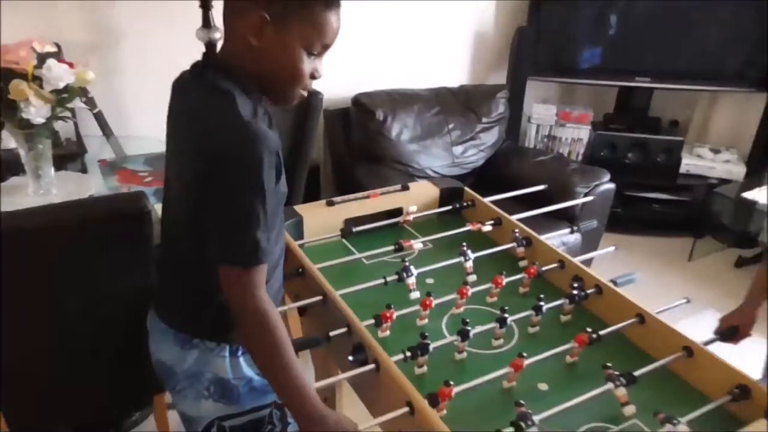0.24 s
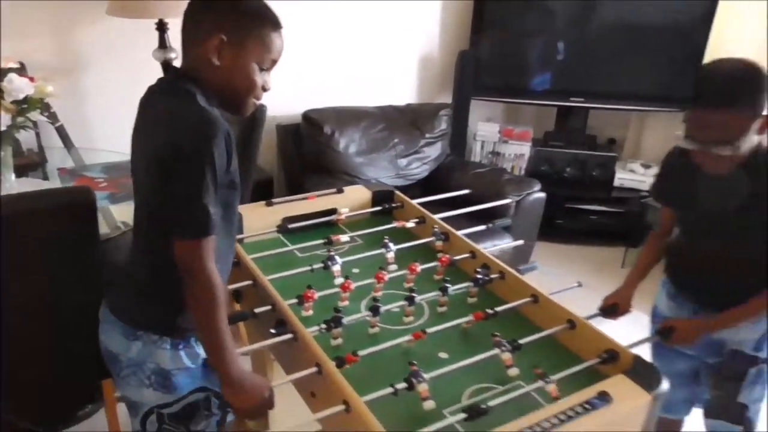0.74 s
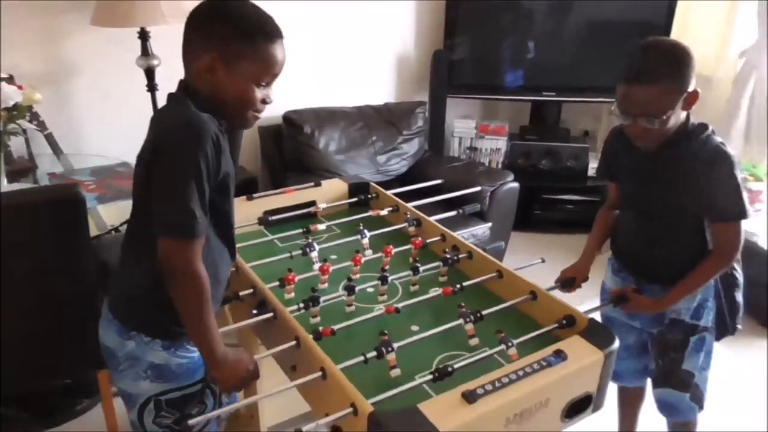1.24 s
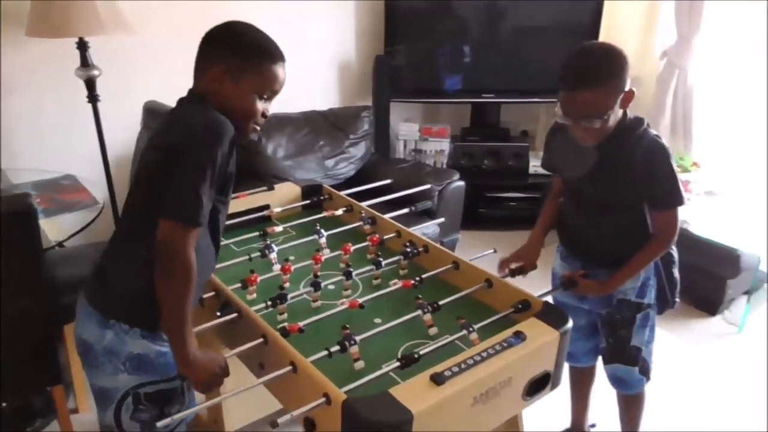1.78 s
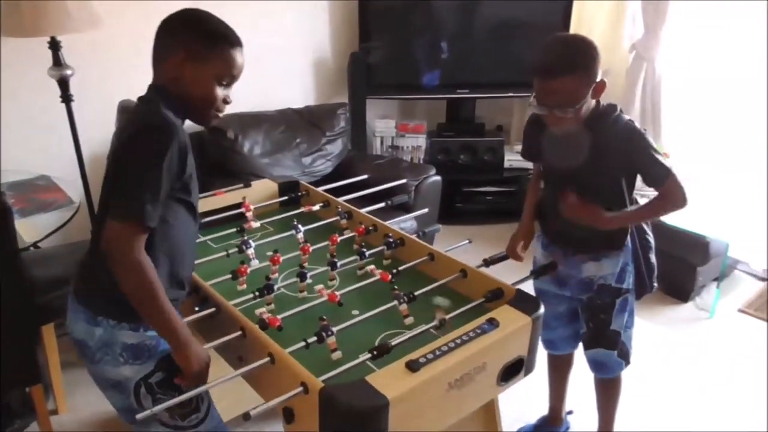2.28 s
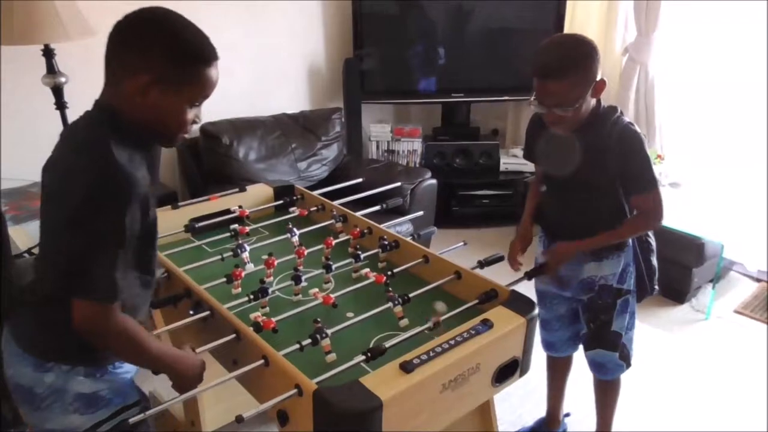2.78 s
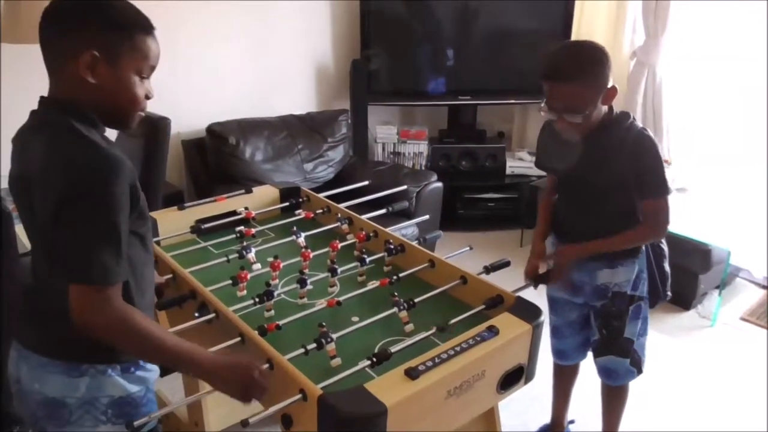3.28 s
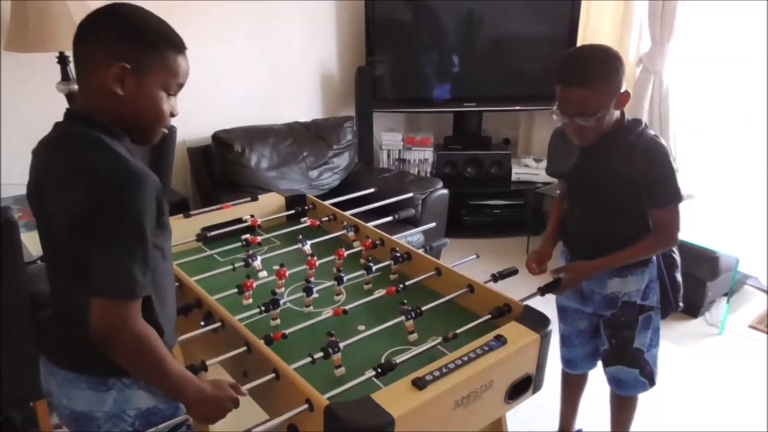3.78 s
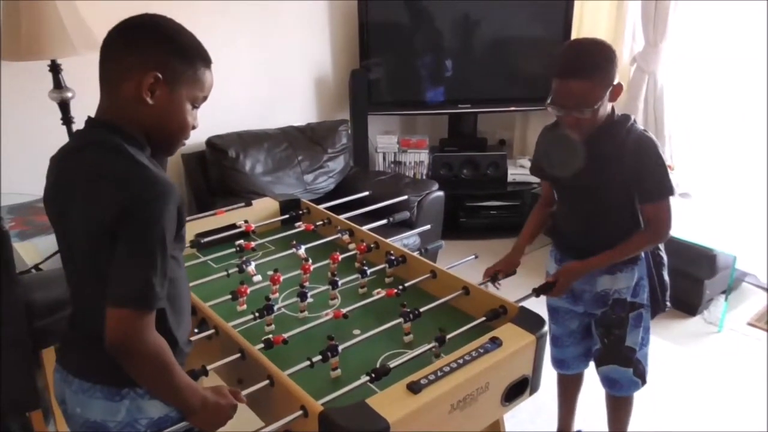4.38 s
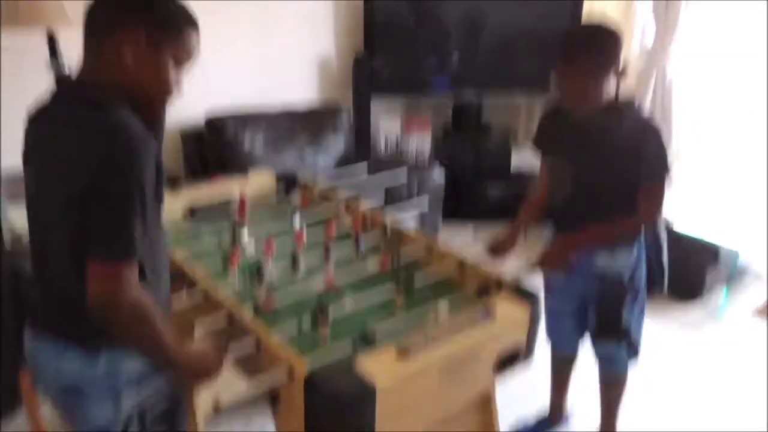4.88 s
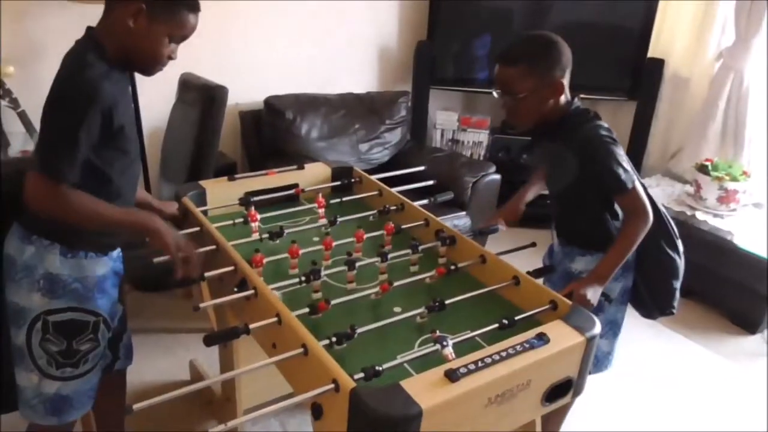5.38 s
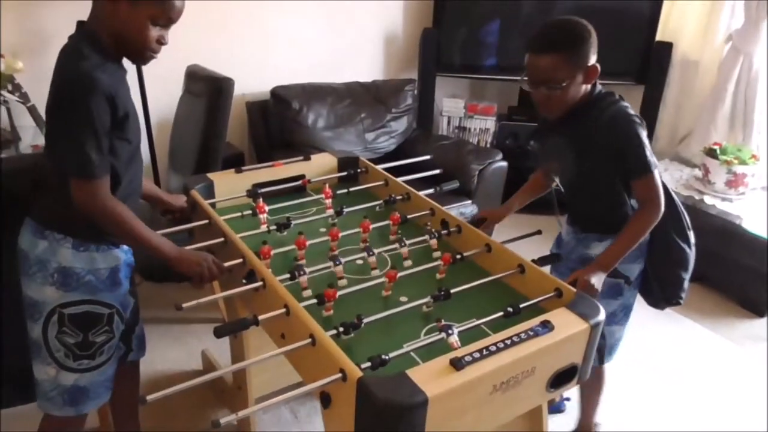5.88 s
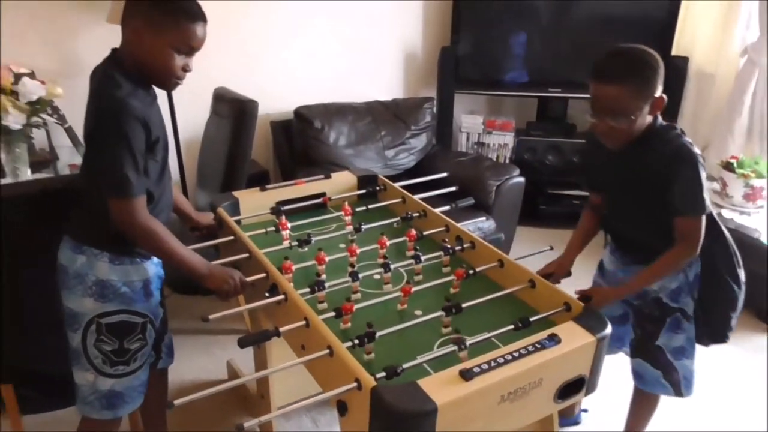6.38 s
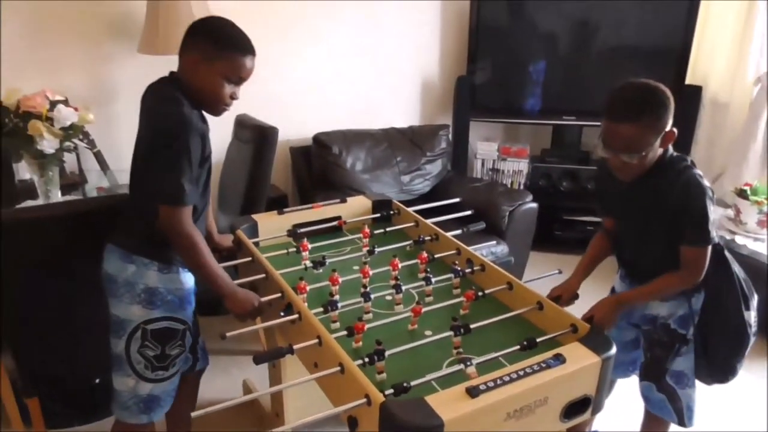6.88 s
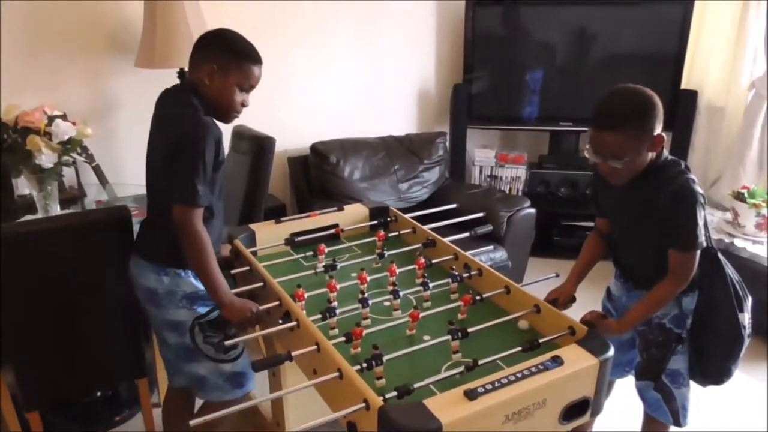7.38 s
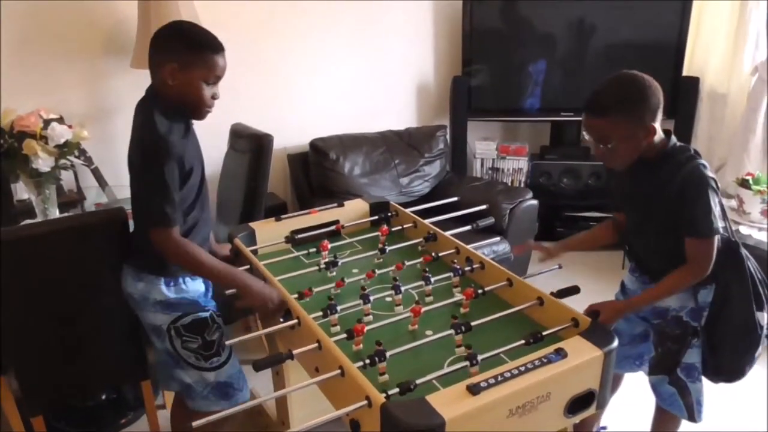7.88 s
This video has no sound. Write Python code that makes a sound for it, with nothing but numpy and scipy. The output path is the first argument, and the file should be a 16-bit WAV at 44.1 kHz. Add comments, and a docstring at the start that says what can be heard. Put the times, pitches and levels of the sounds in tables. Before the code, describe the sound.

Two rallies on a wooden football table in a living room. Sparse light knocks and a tiny metallic jingle lead to dense clacking, rod rattle and sliding hiss. After a lull, the handheld camera creaks and ticks, sound cuts very briefly, and harder strikes resume with bursts of cabinet rumble, ending on a hollow rod scrape. Quiet room tone lies beneath; no speech.

```python
"""A faint rumble, then knocks on hollow wood: table football in a living room.
Ball and players knock on the cabinet, which rings in its wood modes; steel rods clack in their bushes,
hiss and scrape as they slide. The rolling ball and shaken rods tap the cabinet into a rumble.
The hand-held camera creaks once and rumbles low, small parts tick, ring and jingle, and the sound
drops out for a moment between two rallies. Quiet room tone lies under it all."""
import sys
import numpy as np
from scipy import signal
from scipy.fft import rfft, irfft, next_fast_len
from scipy.io import wavfile
from scipy.ndimage import uniform_filter1d

SR = 44100
rng = np.random.default_rng(int(sys.argv[2]) if len(sys.argv) > 2 else 0)


def transcribe(signal):
    """Save signal, clipped to [-1, 1], as a 16-bit WAV file at the path in sys.argv[1]."""
    frames = np.atleast_2d(signal).T
    limited = np.clip(frames, -1, 1)
    pcm = np.round(limited * 32767).astype(np.int16)
    wavfile.write(sys.argv[1], SR, pcm)


N = 358974
HIT = 16384   # samples of one hit


def amp(db):
    """dB to gain."""
    return 10 ** (np.asarray(db) / 20)


def rms_one(x):
    """Scale to rms 1."""
    return x / np.sqrt(np.mean(x ** 2) + 1e-20)


def at_hz(points, hz):
    """Read a curve of (Hz, value) points on a log-frequency axis."""
    point_hz, value = np.transpose(points)
    return np.interp(np.log(hz + 1), np.log(point_hz), value)


def drift(rate_hz):
    """Slow random wander of rms 1: noise smoothed by two equal low-pass poles at this rate."""
    r = np.exp(-80 * np.pi * rate_hz / SR)   # worked out at every 40th sample
    noise = rng.standard_normal(N // 40 + 2002)
    slow = signal.lfilter([1], [1, -2 * r, r * r], noise)[2000:]
    return np.interp(np.arange(N) / 40, np.arange(len(slow)), rms_one(slow))


def modes(hz, t60, size):
    """Spectra of decaying sines, one row a mode; t60 is the time to fall by 60 dB."""
    z = np.exp(-2j * np.pi * np.arange(size // 2 + 1) / size)
    r = amp(-60 / (np.asarray(t60)[:, None] * SR))
    w = 2 * np.pi * np.asarray(hz)[:, None] / SR
    return np.sin(w) * z / (1 - 2 * r * np.cos(w) * z + r * r * z * z)


def rattle(t60, first_db, uneven_db):
    """Spectra of a first contact, then loose parts chattering away in clumps; one row a hit."""
    t = np.arange(HIT // 2) / SR
    clumps = np.repeat(rng.standard_normal((len(t60), HIT // 256)), 128, axis=1)
    fade_db = -60 * t / np.clip(t60, .003, .6)[:, None]
    chatter = rng.standard_normal((len(t60), HIT // 2)) * amp(fade_db + uneven_db * clumps)
    chatter /= np.sqrt(np.sum(chatter ** 2, axis=1, keepdims=True))
    chatter[:, 0] += amp(first_db)
    return rfft(chatter, HIT)


def evened(chatter, size):
    """The gain that takes the broad chance colour out of a chatter."""
    return 1 / np.sqrt(uniform_filter1d(abs(chatter) ** 2, size, axis=1))


def causal(gain):
    """The same colour with all its sound after the contact (minimum phase)."""
    fold = irfft(np.log(gain))
    fold[..., 1:HIT // 2] *= 2
    fold[..., HIT // 2 + 1:] = 0
    return np.exp(rfft(fold))


def place(hits, start_s, level_db, pan_db, size=1):
    """Set each hit at its time, level (rms of its loudest samples) and side (left over right)."""
    out = np.zeros((2, N + HIT))
    for hit, at, hit_db, side_db in zip(hits, start_s, level_db, pan_db):
        i = round(at * SR)
        loudest = np.sqrt(uniform_filter1d(hit ** 2, size).max())
        out[:, i:i + HIT] += hit / loudest * amp(hit_db + side_db * np.array([[.5], [-.5]]))
    return out[:, :N]


def grains(per_s, spread_db):
    """Random small contacts of uneven size, own in each channel row."""
    sizes = amp(spread_db * np.minimum(rng.exponential(1, (2, N)), 5))
    sizes = sizes * rng.choice([-1, 1], (2, N))
    return sizes * (rng.random((2, N)) < per_s / SR)


def widen(pair, alike):
    """Mix two noises as mid and side into left and right; alike 1 is the same in both."""
    return np.sqrt(1 + alike) * pair[0] + np.sqrt(1 - alike) * pair[1] * [[1], [-1]]


def pushes(events, body, first_db):
    """Every event is one clean push on a small body; its modes take a moment to build."""
    start_s, peak_db = np.transpose(events)
    hz, level_db, t60 = np.transpose(body)[:, :, None]
    t = np.arange(HIT // 2) / SR
    build = 1 - np.exp(-t * hz / 1.5)   # over 1.5 cycles
    rings = amp(level_db - 60 * t / t60) * build * np.sin(2 * np.pi * hz * t)
    strength = amp(rng.normal(0, 1.5, (len(start_s), len(hz))))
    taps = rfft(strength @ rings, HIT)
    chatter = rattle(0 * start_s + 0.0025, first_db, uneven_db=1.5)
    return place(irfft(taps * chatter), start_s, peak_db, 0 * start_s)


# Knocks on the cabinet: start_s [s], peak_db [dB, roughly], tilt_db [dB per octave],
# narrow_db [dB of fall one octave off 500 Hz]
KNOCKS = [(0.116, -18.5, 14, 6), (0.14, -26, -2, 14), (0.244, -28.5, 10.5, 11.5), (0.644, -24, 28.5, 12),
          (0.65, -27.5, -12, -2.5), (0.839, -35, 9, 1), (0.916, -27.5, 1, 0), (0.94, -16.5, 2, -1.5),
          (1.235, -29, 5.5, -1), (1.255, -27, 5, 16), (1.348, -39.5, 1.5, -5.5), (1.736, -31, -0.5, -0.5),
          (1.893, -31, -3, 0.5), (1.91, -30, -3.5, -1.5), (1.983, -30, -7, 6), (2.187, -24.5, -0.5, -1.5),
          (2.272, -22, 5, 1.5), (2.325, -24.5, -15, 7), (2.345, -21, -3, 11), (2.399, -10, 2.5, 0),
          (2.435, -18.5, 5, -4), (2.509, -18, 11, 9), (2.539, -19, 1, 30), (2.582, -24, 1, 17),
          (2.645, -19, 3, 16), (2.661, -10.5, 2.5, 0), (2.676, -10, 1.5, -1.5), (2.837, -9, -4, 1),
          (2.885, -24, 1, -2.5), (2.872, -13.5, 2, -4.5), (3.061, -22.5, 10, 16), (3.092, -24, 14, 26),
          (3.417, -31.5, 10, 0), (3.426, -16, 5, -1.5), (3.443, -13.5, 8.5, -3.5), (3.459, -20.5, 3, 3),
          (3.485, -15.5, 9, 10), (3.515, -20, 1, -2.5), (3.532, -17, 15, 14), (3.575, -21, 0, 1),
          (3.849, -28.5, 0.5, -6), (3.959, -28.5, 5, -2), (4.131, -40, -1, 0), (4.226, -32.5, 6.5, 4.5),
          (4.401, -42.5, -9, 15), (4.491, -28, 5, 9), (4.908, -30, 8.5, 6), (4.925, -32.5, -3, 0),
          (5.054, -32, 14, 4.5), (5.455, -14, 0, -5), (5.482, -13.5, 11, -5), (5.574, -19.5, -21, 17),
          (5.626, -33, 16, 1), (5.644, -18.5, 5, -2), (5.7234, -7.5, 8, 0.5), (5.732, -12.5, -7.5, -1),
          (5.763, -16, 0, -3), (5.81, -22, -5, 2), (5.876, -17, 8, -1), (5.922, -18.5, -5, 0),
          (6.001, -20.5, 18, 19), (6.077, -11.5, -10, 3.5), (6.11, -22, -2, -1), (6.145, -13, -20, 35),
          (6.18, -23.5, -33, 38), (6.324, -9.5, 10.5, 38), (6.356, -36, 17, 5), (6.82, -15, 6.5, 3.5),
          (6.833, -18, 5, 11), (6.85, -20.5, -15, 42), (7.201, -8, 4, -1.5), (7.213, -12, -3.5, 1.5),
          (7.232, -15, 3.5, -5), (7.299, -29, -16, 11), (7.523, -23.5, 11, -9.5), (7.533, -14.5, 22, -2.5),
          (7.56, -20, 17, -4), (7.807, -18, 5.5, 5)]
# Tones in which the hollow wooden cabinet rings: pitch_hz [Hz], level_db [dB, relative]
CABINET = [(125, -23), (160, -15.5), (190, -12), (220, -5.5), (255, -1.5), (300, -5.5), (340, -1.5),
           (372, 1), (415, -3.5), (455, -3), (495, 0), (550, -4.5), (605, 0.5), (655, -2.5), (715, 0.5),
           (780, -2), (840, -1), (915, -2), (990, -4), (1080, -5.5), (1170, -8.5), (1255, -10.5),
           (1350, -10.5), (1450, -11.5), (1570, -14), (1720, -31), (1880, -26.5), (2050, -27), (2250, -28)]
WOOD_CYCLES, WOOD_T60_S = 14.8, 0.028   # a cabinet mode rings this many cycles plus this long
PITCH_SPREAD = 0.034   # where a knock lands shifts the modes by about this share
KNOCK_RISE_S = 0.0015   # the panel takes this long to answer
KNOCK_RATTLE_S, KNOCK_FIRST_DB = 0.05, 4   # rattle t60; first contact over its rattle
KNOCK_CREST_DB = 8   # peak of a knock over the rms of its loudest moment
TABLE_PAN_DB = -2   # left over right


def knocks():
    """Each knock rings the cabinet modes by where and how hard it lands, with chance strengths and signs."""
    start_s, peak_db, tilt_db, narrow_db = np.transpose(KNOCKS)
    hz, level_db = np.transpose(CABINET)
    octaves = np.log2(hz / 500)
    strength = amp(level_db + tilt_db[:, None] * octaves - narrow_db[:, None] * octaves ** 2)
    chance = rng.standard_normal((len(start_s), 3, len(hz)))
    strength = strength * amp(2.0 * chance[:, 0]) * np.sign(chance[:, 1] + .15)
    t = np.arange(HIT // 2) / SR
    fade = amp(-60 * t / (WOOD_T60_S + WOOD_CYCLES / hz)[:, None])
    fade = fade * (1 - np.exp(-t / KNOCK_RISE_S))
    rings = []
    for gains, shift in zip(strength, 1 + PITCH_SPREAD * chance[:, 2]):
        rings.append(gains @ (fade * np.sin(2 * np.pi * (hz * shift)[:, None] * t)))
    rings = rfft(rings, HIT)
    # a padded contact takes its time, which softens the treble above 2 kHz
    soft = 1 / (1 + 1j * np.arange(HIT // 2 + 1) * SR / HIT / 2000) ** 4
    chatter = rattle(0 * start_s + KNOCK_RATTLE_S, KNOCK_FIRST_DB, uneven_db=-2.0)
    hits = irfft(rings * soft * chatter * causal(evened(chatter, size=40)))
    return place(hits, start_s, peak_db - KNOCK_CREST_DB, 0 * start_s + TABLE_PAN_DB, size=700)


# Tones of the steel rods: pitch_hz [Hz], width_hz [Hz], level_db [dB, relative]
RODS = [(2740, 77, -1.5), (3623, 166, 9), (4160, 260, 3.5), (4750, 220, -18), (2050, 31, -2),
        (7050, 1160, 6.5), (8260, 210, 12.5), (10770, 1100, 5), (13300, 1200, 9)]
# Broad contact noise under the rod tones: pitch_hz [Hz], level_db [dB per Hz, relative]
CRACK = [(710, -1), (1200, 0.5), (1720, -9), (2030, -7.5), (2390, -13.5), (3590, -14.5), (6080, -18),
         (8260, -19), (9020, -17.5), (13800, -24.5), (14800, -30), (16500, -38)]


def rod_colour(size, modes_db):
    """Broad contact noise, dying out in the bass, and the rod modes that stand out of it."""
    hz = np.arange(1, size // 2 + 2) * SR / size
    top_hz, width_hz, level_db = np.transpose(RODS)
    peaks = amp(level_db + modes_db)[:, None] / np.hypot(1, 2 * (hz - top_hz[:, None]) / width_hz[:, None])
    return amp(at_hz(CRACK, hz)) / (1 + (700 / hz) ** 2), peaks


# Clacks of rods, players and ball: start_s [s], peak_db [dB], rattle_t60_s [s],
# body_db [dB, below about 3 kHz], tilt_db [dB, up above 5 kHz and down below it]
CLACKS = [(0.642, -33.5, 0.54, 5, 2.5), (0.8352, -36.5, 0.63, 1, -0.5), (0.937, -25.5, 0.045, 12, 0),
          (0.951, -26.5, 0.034, -10, 0), (0.986, -30, 0.012, -10, 0), (1.342, -41, 0.25, -19, 4),
          (1.593, -45.5, 0.2, 9, 1.5), (1.684, -41.5, 0.027, 11, -4), (1.714, -38, 0.011, 11, -1),
          (1.739, -28.5, 0.06, 5, 4.5), (1.775, -42.5, 0.034, 5, 2.5), (1.872, -44.5, 0.02, -3, 10),
          (2.1246, -35, 0.11, 8, 6.5), (2.214, -29.5, 0.024, -12, -5), (2.2689, -29.5, 0.045, 6, -1),
          (2.309, -29.5, 0.21, 0, -1.5), (2.3413, -20, 0.19, 4, 0), (2.3975, -10.5, 0.038, 13, 5),
          (2.417, -20, 0.05, 9, 1), (2.4802, -23.5, 0.036, 2, -2), (2.511, -41, 0.05, 5, -6),
          (2.6604, -23.5, 0.18, 14.5, 2.5), (2.8336, -14, 0.027, 18.5, 5), (2.8828, -18.5, 0.16, 5.5, -0.5),
          (2.988, -27, 0.05, 0, -2), (3.046, -25, 0.27, -2, -2), (3.099, -29, 0.033, -9, -5),
          (3.4246, -16, 0.14, 2, -1.5), (3.458, -16, 0.28, -3, -1.5), (3.4898, -20, 0.17, 11.5, 2),
          (3.528, -15, 0.03, -7, -3.5), (3.585, -27, 0.048, -9, -19), (3.924, -32.5, 0.023, -4, -6),
          (3.958, -29, 0.034, -8, -2), (4.08, -40, 0.049, -8, -4), (4.136, -31.5, 0.027, -10.5, -3.5),
          (4.4115, -37, 0.077, -18, -6), (4.4187, -29.5, 0.053, -6, 0), (4.49, -24.5, 0.025, -12, -4.5),
          (4.6468, -35, 0.034, 2, -2.5), (5.049, -29.5, 0.057, -11, -4.5), (5.2853, -37.5, 0.021, -24, -8),
          (5.3084, -24, 0.027, -8, -1), (5.3592, -24, 0.0079, -32, 3), (5.4564, -7, 0.017, 7.5, -1.5),
          (5.4695, -27, 0.06, 13, -11), (5.6268, -15, 0.04, 5.5, 2.5), (5.724, -25, 0.17, -1, 0.5),
          (6.0756, -21.5, 0.034, 22.5, 0.5), (6.323, -18.5, 0.034, 7, -1.5),
          (6.4456, -36, 0.025, -16, -3.5), (6.5213, -29.5, 0.17, -4, -1), (6.607, -38, 0.041, -13, -3.5),
          (6.64, -38, 0.037, -6, -5), (6.659, -44, 0.046, -11, -1), (6.673, -39, 0.054, 4, 0),
          (6.71, -41, 0.057, -4, -1), (7.2, -9, 0.014, -1.5, 1), (7.229, -21, 0.037, -14, -1),
          (7.345, -35, 0.035, -8, 0), (7.4625, -35.5, 0.025, -12, -3), (7.473, -34, 0.032, -8, -1),
          (7.5135, -22, 0.02, 8, 7), (7.521, -16, 0.015, 7, 0), (7.5232, -8, 0.024, 5, -6),
          (7.527, -21, 0.11, 13, -8), (7.804, -35, 0.079, 26, 1.5)]
# First contact over a 0.15 s rattle, and its change for each halving of the rattle
CLACK_FIRST_DB, FIRST_DB_PER_HALVING = -13.5, -0.5
SPREAD_DB, SPREAD_HZ = -5.5, 4000   # the treble of a rattle comes from all along the rod


def clacks(start_s, peak_db, t60, body_db, tilt_db, pan_db):
    """A sharp crack coloured by ringing parts; a harder contact tilts it brighter, a heavier one adds body."""
    broad, peaks = rod_colour(HIT, modes_db=1.0)
    struck = amp(rng.normal(0, 5.8, (len(start_s), len(RODS)))) @ peaks
    hz = np.arange(1, HIT // 2 + 2) * SR / HIT
    slope_db = tilt_db[:, None] * np.tanh(2 * np.log2(hz / 5000))
    bright = amp(slope_db + body_db[:, None] / (1 + (hz / 2800) ** 4))
    first_db = CLACK_FIRST_DB + FIRST_DB_PER_HALVING * np.log2(.15 / np.clip(t60, .003, .6))
    chatter = rattle(t60, first_db, uneven_db=3.5)
    even = evened(chatter, size=120)
    aside = amp(SPREAD_DB) * rattle(t60, first_db=-64, uneven_db=-8.5) * 1j * hz / (SPREAD_HZ + 1j * hz)
    pair = chatter[:, None] + aside[:, None] * [[1], [-1]]
    hits = irfft(causal(broad * bright * (1 + struck) * even)[:, None] * pair)
    return place(hits, start_s, peak_db, pan_db)


def after_hits(base_db, hits, gain_db, rise_s, t60):
    """A level in dB, raised after every hit by a swell that dies away."""
    power = np.zeros(N)
    power[np.round(hits[0] * SR).astype(int)] = amp(hits[1] + gain_db) ** 2
    rise, fall = np.exp(-1 / (rise_s * SR)), amp(-60 / (t60 * SR)) ** 2
    dying = signal.lfilter([1], [1, -fall], power + 1e-18)
    power = signal.lfilter([1 - rise], [1, -rise], dying)
    return 10 * np.log10(amp(base_db) ** 2 + power)


# Play between the hits, one list a rally: start_s [s], rumble_db [dB, drive of the cabinet],
# rumble_tilt_db [dB per octave], hiss_db [dB]
PLAY = [
    [(0.0, -53, -2, -56), (0.57, -67.5, -6.5, -68.5), (0.83, -48.5, -2, -62.5), (1.3, -59.5, -6.5, -60.5),
     (1.66, -62, -8, -68), (2.1, -56, -2.5, -59.5), (2.5, -37.5, 3.5, -45), (2.78, -45, -3.5, -61),
     (3.13, -39, 0, -50.5), (3.22, -51, 0, -100), (3.4, -67, -9, -67.5), (3.6, -38.5, 2.5, -43.5),
     (3.75, -46, -3.5, -58), (4.3, -60.5, 0.5, -109), (4.75, -48.5, -2.5, -50.5), (5.14, -65, -3, -58)],
    [(5.2, -37.5, -3.5, -50.5), (5.4, -40, -3.5, -69), (5.52, -28, 0, -74), (5.7, -35.5, -2, -46.5),
     (5.86, -40, 3, -57), (6.05, -36.5, -3, -62), (6.18, -38.5, -3.5, -75), (6.4, -46.5, 0, -58),
     (6.55, -40, -5.5, -63), (6.85, -47, 1, -61), (7.18, -47.5, -8, -55.5), (7.33, -30.5, -2, -49.5),
     (7.7, -37.5, -1.5, -82), (7.92, -39.5, -6.5, -63), (7.95, -34, -4.5, -55.5), (8.14, -42, -6, -58)],
]
SHAKE_DB, SHAKE_RISE_S, SHAKE_T60_S = -21.5, 0.0097, 0.19   # a knock leaves the cabinet rumbling
BUZZ_DB, BUZZ_RISE_S, BUZZ_T60_S = -37.5, 0.023, 0.42   # a clack leaves the rods hissing


def play_levels():
    """Rolling and sliding follow the rallies; every hit shakes them louder for a moment."""
    start_s, *play = np.concatenate(PLAY).T
    t = np.arange(N) / SR
    rolling_db, tilt_db, sliding_db = (np.interp(t, start_s, column) for column in play)
    rumble_db = after_hits(rolling_db, np.transpose(KNOCKS), SHAKE_DB, SHAKE_RISE_S, SHAKE_T60_S)
    hiss_db = after_hits(sliding_db, np.transpose(CLACKS), BUZZ_DB, BUZZ_RISE_S, BUZZ_T60_S)
    return rumble_db, tilt_db, hiss_db


def rumble(level_db, tilt_db):
    """The rolling ball and shaken rods tap the cabinet densely; as they move, other modes answer."""
    taps = grains(per_s=3000, spread_db=2.5)
    taps = taps / taps.std() * amp(level_db + 1.5 * drift(14))
    out = 0
    for k, (hz, mode_db) in enumerate(CABINET):
        r = amp(-60 / ((WOOD_T60_S + WOOD_CYCLES / hz) * SR))
        w = 2 * np.pi * hz / SR
        answer = amp(mode_db + tilt_db * np.log2(hz / 400) + 2.5 * drift(5.4))
        gain = np.sin(w) * np.sqrt(1 - r)
        ring = signal.lfilter([0, gain], [1, -2 * r * np.cos(w), r * r], taps * answer)
        out = out + (-1) ** k * widen(ring, alike=np.clip(1.0 - hz / 5000, 0, 1))
    return out


def hiss(level_db):
    """Rods sliding in their bushes: fine grit through the rod colour."""
    size = next_fast_len(N + HIT)
    broad, peaks = rod_colour(size, modes_db=-9.0)
    grit = grains(per_s=9000, spread_db=2.5) * amp(1.2 * drift(25))
    colour = broad * (1 + peaks.sum(0))
    scale = np.sqrt(np.mean(colour ** 2) * np.mean(grit ** 2))
    coloured = irfft(rfft(grit * amp(level_db), size) * colour, size)[:, :N]
    return widen(coloured, alike=0.075) / scale


# A hollow rod scrapes through its bush: start_s [s], length_s [s], level_db [dB]
SCRAPES = [(1.111, 0.2, -54), (7.952, 0.3, -42)]
# Tones of the air in the hollow rod: pitch_hz [Hz], width_hz [Hz], level_db [dB, relative]
TUBE = [(380, 45, 12), (1440, 39, -0.5), (2160, 91, -8), (2900, 370, 1), (3560, 120, -19), (4470, 130, -9)]
SCRAPE_EDGE_S = 0.036   # fade at either end of a scrape


def scrapes():
    """Grit under each stroke sets the air in the tube sounding."""
    t, size = np.arange(N) / SR, next_fast_len(N + HIT)
    stroke = 0
    for start_s, length_s, level_db in SCRAPES:
        to_edge_s = np.minimum(t - start_s, start_s + length_s - t)
        stroke = stroke + amp(level_db) * np.clip(to_edge_s / SCRAPE_EDGE_S, 0, 1)
    hz, width_hz, tone_db = np.transpose(TUBE)
    colour = amp(tone_db) @ modes(hz, np.log(1000) / (np.pi * width_hz), size)
    grit = rfft(grains(per_s=4000, spread_db=2.5), size)
    sounding = rms_one(irfft(grit * colour, size)[:, :N])
    return stroke * amp(2.0 * drift(17)) * widen(sounding, alike=0.77)


# How long the living room rings: pitch_hz [Hz], t60_s [s]
ROOM_T60 = [(150, 0.27), (500, 0.31), (1500, 0.3), (4000, 0.39), (10000, 0.15)]
ROOM_DB, ROOM_GAP_S = -1, 0.0081   # gain of the reflections; time they take to fade in


def room(x):
    """Dense reflections dying by octave band, partly own in each channel."""
    t, tail = np.arange(SR // 2) / SR, 0
    for low in 60 * 2.0 ** np.arange(8):
        octave = signal.butter(2, [low, 2 * low], "band", fs=SR, output="sos")
        band = signal.sosfilt(octave, rng.standard_normal((2, len(t))))
        alike = np.clip(1.0 - 0.065 * np.log2(low / 120) ** 1.57 if low > 120 else 1.0, 0, 1)
        decay = amp(-60 * t / at_hz(ROOM_T60, low * np.sqrt(2)))
        tail = tail + widen(band, alike) * decay / np.sqrt(np.sum(decay ** 2))
    tail = tail * np.clip(t / ROOM_GAP_S, 0, 1) ** 2
    return amp(ROOM_DB) * signal.fftconvolve(x.mean(0)[None], tail, axes=1)[:, :N]


# A loose part rings out of some clacks and ticks: start_s [s], pitch_hz [Hz], peak_db [dB]
PINGS = [(0.938, 2680, -34), (0.937, 3560, -38), (0.95, 3600, -35), (2.214, 3700, -41), (4.978, 4600, -33),
         (4.963, 3390, -29), (4.967, 9750, -29), (5.6256, 10500, -13), (5.6242, 14000, -17),
         (5.7245, 13000, -28), (7.229, 8300, -21), (7.4635, 9900, -34), (7.524, 7100, -16)]
PING_T60_S, PING_RATTLE_S = 0.022, 0.0087   # ring of a 3.6 kHz part, higher ones die faster; rattle t60


def pings():
    """One short mode, struck and shaken for a moment."""
    start_s, hz, peak_db = np.transpose(PINGS)
    t60 = PING_T60_S * (3600 / hz) ** 2
    shaken = rattle(0 * start_s + PING_RATTLE_S, first_db=-9.0, uneven_db=15.0)
    return place(irfft(modes(hz, t60, HIT) * shaken), start_s, peak_db, 0 * start_s)


# A small loose metal part jingles close by: start_s [s], peak_db [dB]
JINGLES = [(1.738, -27), (1.7415, -27), (1.7455, -25), (1.75, -29), (1.763, -31), (1.768, -38)]
# Tones of that part: pitch_hz [Hz], level_db [dB, relative], t60_s [s]
JINGLE_MODES = [(3300, -10, 0.011), (4500, -6, 0.011), (5680, -21, 0.013), (7240, 0, 0.0094),
                (8000, 3, 0.012), (8900, 1, 0.0089)]


def jingle():
    """A few quick pushes ring the high, short modes of a small metal part."""
    return pushes(JINGLES, JINGLE_MODES, first_db=1.0)


# Dry ticks close by: start_s [s], peak_db [dB], tilt_db [dB, up above 5 kHz and down below it],
# pan_db [dB, left over right]
TICKS = [(4.681, -35, -5, 13), (4.7037, -20, 9, 0), (4.733, -27.5, -2, 17), (4.832, -29.5, -2, -1),
         (4.9634, -30.5, -2, 19.5), (4.968, -36, -2, -17), (4.978, -32.5, 1, -11), (4.987, -38, -4, 22)]


def ticks():
    """Small contacts close by: clacks with a 0.02 s rattle and no added body."""
    start_s, peak_db, tilt_db, pan_db = np.transpose(TICKS)
    return clacks(start_s, peak_db, 0 * start_s + 0.02, 0 * start_s, tilt_db, pan_db)


# Slips of the hand-held camera's creaking housing, mostly ever slower: start_s [s], peak_db [dB]
SLIPS = [(4.725, -28), (4.7346, -40), (4.743, -34), (4.7515, -22.5), (4.763, -34), (4.7761, -24),
         (4.792, -22), (4.815, -23.5)]
# Tones of the housing: pitch_hz [Hz], level_db [dB, relative], t60_s [s]
SLIP_MODES = [(890, 8, 0.028), (1040, 8, 0.022), (152, -12, 0.03), (2100, -12, 0.004), (3730, -7, 0.008),
              (4550, -13, 0.004)]


def creak():
    """A chain of small slips, each ringing the camera's housing, adds up to a creak."""
    return pushes(SLIPS, SLIP_MODES, first_db=14.0)


# Low rumble of the hand-held camera: start_s [s], level_db [dB]
SWAY = [(0.0, -64), (0.22, -100), (0.7, -66), (1.84, -84), (2.45, -64), (2.54, -83), (2.72, -62),
        (3.35, -87), (3.42, -65), (3.72, -83), (4.67, -76), (4.71, -53), (4.85, -47), (4.89, -86),
        (4.96, -48), (5.039, -91), (5.21, -52), (5.7, -62), (7.03, -97.5), (7.19, -60), (8.14, -74)]
SWAY_LOW_HZ, SWAY_HIGH_HZ = 41, 114


def sway():
    """Lumpy low noise from the hands, own in each channel."""
    band = signal.butter(3, [SWAY_LOW_HZ, SWAY_HIGH_HZ], "band", fs=SR, output="sos")
    low = signal.sosfilt(band, rng.standard_normal((2, N)))
    level_db = np.interp(np.arange(N) / SR, *np.transpose(SWAY))
    return amp(level_db + 2.0 * drift(9.5)) * rms_one(low)


# Colour of the room tone: pitch_hz [Hz], level_db [dB per Hz, relative]
AIR = [(15, -44), (25, -36), (64, -17), (123, 2), (354, 11), (714, 1), (1400, -9), (1790, -27),
       (12200, -14.5), (14800, -22), (16000, -61)]
AIR_DB = -58.5   # rms level


def air():
    """Quiet room tone: steady coloured noise."""
    size = next_fast_len(N)
    colour = amp(at_hz(AIR, np.arange(size // 2 + 1) * SR / size))
    pair = irfft(rfft(rng.standard_normal((2, size))) * colour, size)[:, :N]
    return amp(AIR_DB) * rms_one(widen(pair, alike=0.31))


def scene():
    """Hits in the room over rumble, hiss and scrapes; room tone, small parts and camera noises stay dry."""
    rumble_db, tilt_db, hiss_db = play_levels()
    table = knocks() + clacks(*np.transpose(CLACKS), pan_db=np.zeros(len(CLACKS)))
    table = table + room(table) + rumble(rumble_db, tilt_db) + hiss(hiss_db) + scrapes()
    # a light cabinet radiates no deep bass
    table = signal.sosfilt(signal.butter(4, 105, "high", fs=SR, output="sos"), table)
    return table + pings() + jingle() + ticks() + creak() + sway() + air()


# Treble dip of the microphone: pitch_hz [Hz], width_hz [Hz], depth [0-1]
TREBLE_DIP = (6180, 1080, 0.33)
# The moment of near silence: start_s [s], end_s [s]
DROPOUT_S = (5.140, 5.202)
CUTOFF_HZ = 16640


def record(dry):
    """The microphone has a dip in the treble, the sound drops out briefly, the top is cut."""
    t = np.arange(N) / SR
    hz, width_hz, depth = TREBLE_DIP
    peak = signal.lfilter(*signal.iirpeak(hz, hz / width_hz, fs=SR), dry)
    dry = dry - np.clip(depth, 0, 1) * peak
    outside_s = np.maximum(DROPOUT_S[0] - t, t - DROPOUT_S[1])
    heard = np.clip(outside_s / 0.00015, .004, 1)
    return signal.sosfilt(signal.cheby2(12, 70, CUTOFF_HZ, fs=SR, output="sos"), dry * heard)


dry = scene()
out = record(dry)
transcribe(out)
```